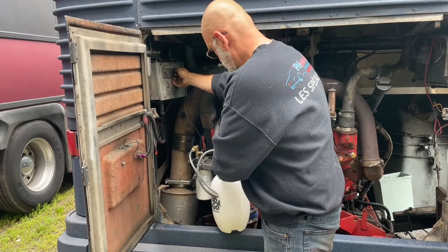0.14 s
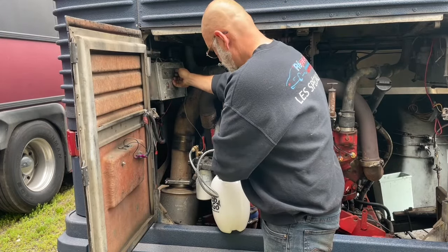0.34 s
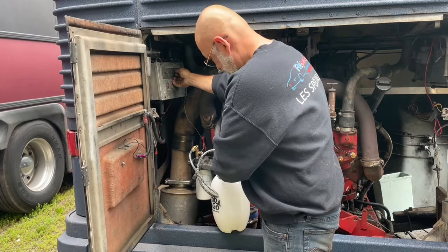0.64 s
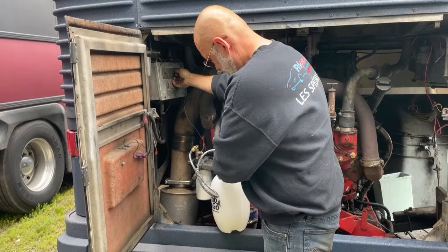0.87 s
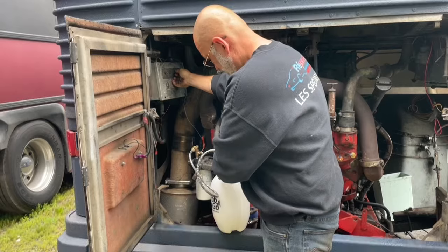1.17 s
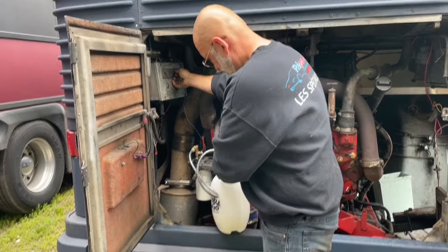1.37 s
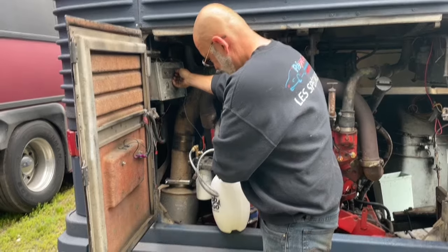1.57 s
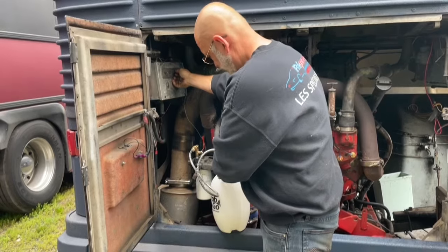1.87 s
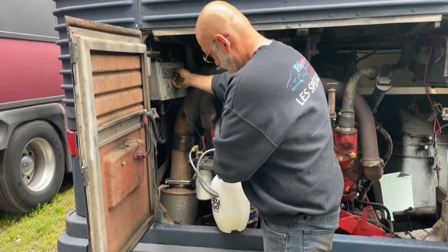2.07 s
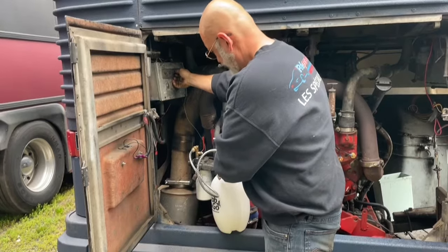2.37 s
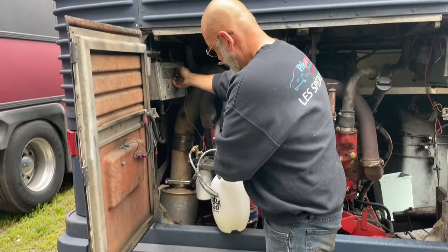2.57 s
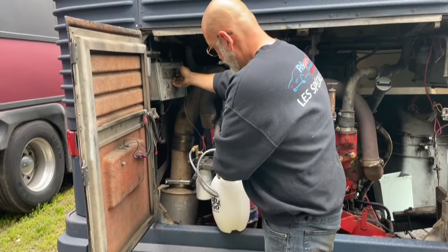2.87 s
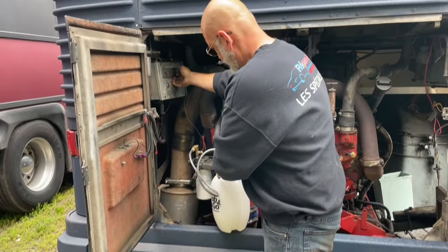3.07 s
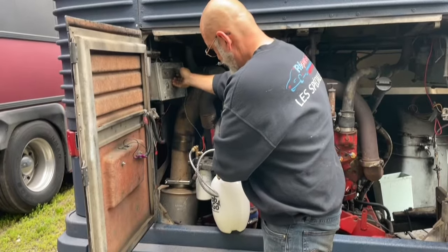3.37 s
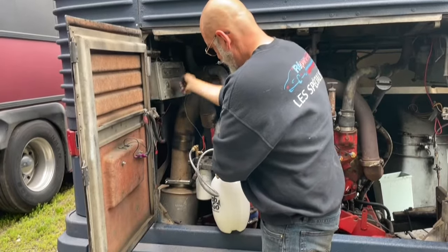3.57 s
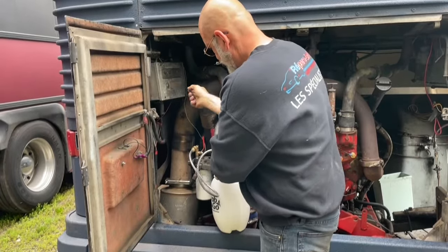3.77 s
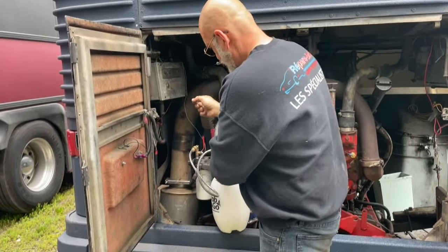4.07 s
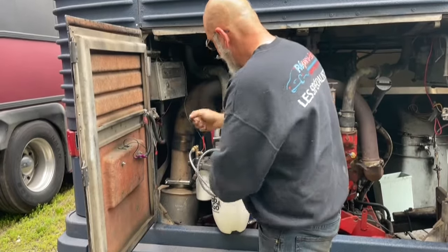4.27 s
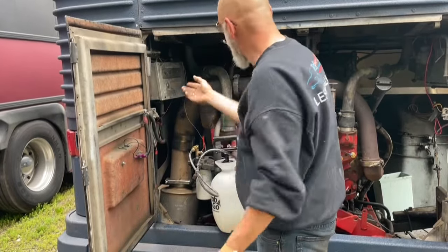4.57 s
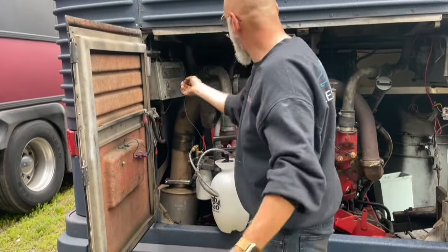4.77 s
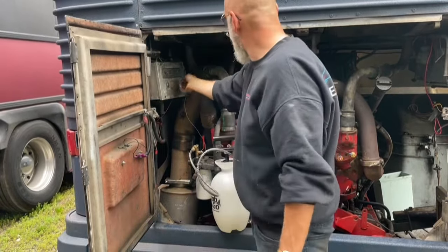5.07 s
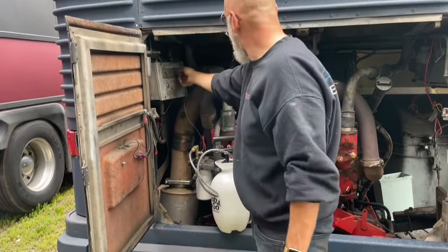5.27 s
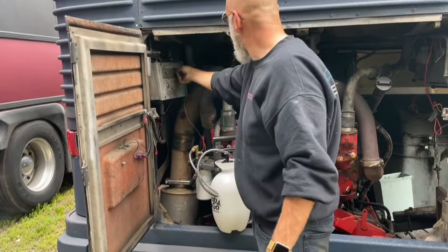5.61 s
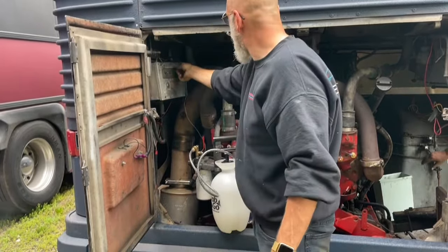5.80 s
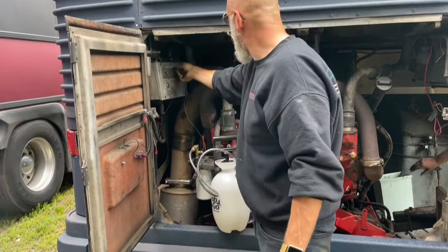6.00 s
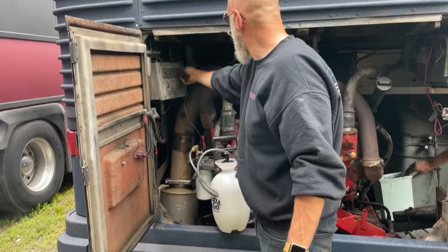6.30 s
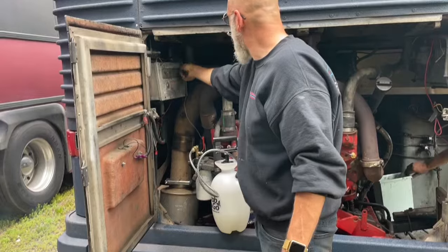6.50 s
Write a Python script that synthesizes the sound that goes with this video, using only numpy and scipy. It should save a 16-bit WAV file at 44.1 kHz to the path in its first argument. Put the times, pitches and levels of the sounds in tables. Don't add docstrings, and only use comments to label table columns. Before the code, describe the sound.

Outdoors, close to an open engine bay, faint traffic wash for a moment, then a short bright air hiss, a hard gear clank and a straining motor groan. The big diesel catches with misses, surges within a second, and hammers loudly with valve clatter. A metallic gear whine continues until about two and a half seconds, then drops out, leaving a deep lumpy idle with occasional coughs from the exhaust. Stereo microphones a step or two away.

```python
import sys
import numpy as np
from scipy import signal
from scipy.fft import rfft, irfft, next_fast_len
from scipy.io import wavfile
from scipy.ndimage import uniform_filter1d, map_coordinates

SR = 44100
rng = np.random.default_rng(int(sys.argv[2]) if len(sys.argv) > 2 else 0)


def invert_db(x):
    u = np.asarray(x, float) / 20
    return 10 ** u


def dump(signal):
    limited = np.clip(np.atleast_2d(signal).T, -1, 1)
    pcm = np.round(limited * 32767).astype(np.int16)
    wavfile.write(sys.argv[1], SR, pcm)


N = 293072


def unit(x):
    return x / np.sqrt(np.mean(x ** 2) + 1e-20)


def along(points, hz, column=1):
    rows = np.array(points)
    return np.interp(np.log(hz + 1), np.log(rows[:, 0] + 1), rows[:, column])


def wobble(rate_hz):
    knots = rng.standard_normal(int(N * rate_hz / SR) + 4)
    return map_coordinates(knots, [np.arange(N) * rate_hz / SR])


def filtered(x, response):
    m = next_fast_len(N + SR // 2)
    return irfft(rfft(x, m) * response(np.fft.rfftfreq(m, 1 / SR)), m)[..., :N]


def mode(f, hz, width):
    return 1j * f * width / (hz * hz - f * f + 1j * f * width)


def body(modes):
    return lambda f: sum((-1) ** k * invert_db(db) * mode(f, hz, w) for k, (hz, w, db) in enumerate(modes))


def noise(response, envelope=1):
    if not callable(response):
        points = response
        response = lambda f: invert_db(along(points, f))
    return unit(filtered(envelope * rng.standard_normal((2, N)), response))


def patchy(x, depth_db):
    z = signal.stft(x, nperseg=512)[2]
    field = uniform_filter1d(rng.standard_normal(z.shape[1:]), size=4, axis=0)
    field = uniform_filter1d(field, size=6, axis=1)
    return unit(signal.istft(z * invert_db(depth_db * unit(field)), nperseg=512)[1][:, :N])


def dying(impulses, t60):
    return signal.lfilter([1], [1, -invert_db(-60 / (t60 * SR))], impulses)


def gate(start, stop, edge):
    t = np.arange(N) / SR
    return np.clip(60 / edge * np.minimum(t - start, stop - t), -120, 0)


def peak(at, rise_db, fall_db):
    t = np.arange(N) / SR - at
    return np.minimum(rise_db * t, -fall_db * t)


# t/s, cycles of two turns per second/Hz
CRANK_SPEED = [(0.4, 1.279), (1, 5.436), (1.1, 5.636), (1.3, 6.741), (1.5, 6.776), (1.9, 6.278),
               (2.25, 6.184), (2.5, 6.311), (2.9, 6.077), (3.5, 6.24), (4.5, 6.304), (6.65, 6.403)]


def speed():
    return np.interp(np.arange(N) / SR, *np.transpose(CRANK_SPEED))


def crank():
    start_cycle = .7778
    return start_cycle + np.cumsum(speed()) / SR


def follows(full_db, running_speed, slope_db):
    turn_s = .495
    growth_db = slope_db * np.log2(np.minimum(speed() / running_speed, 1))
    return full_db + growth_db + gate(turn_s, 9, .06)


def strikes(degrees, sizes, scatter_db, jitter_deg):
    turned = crank()
    cycles = np.arange(1, int(turned[-1]) + 1)[:, None]
    chance = rng.standard_normal((len(cycles), len(degrees), 2))
    at = cycles + (degrees + jitter_deg * chance[..., 0]) / 720
    sample = np.interp(at, turned, np.arange(N), right=N).astype(int)
    force = sizes * invert_db(scatter_db * chance[..., 1])
    return np.bincount(sample.ravel(), force.ravel(), N + 1)[:N]


# f/Hz, level per Hz/dB
YARD_SPECTRUM = [(40, -90), (120, -84), (350, -81), (900, -78), (2300, -81), (4000, -97), (12000, -99),
                 (14000, -120)]


def yard():
    wash = invert_db(-52 + wobble(14)) * noise(YARD_SPECTRUM)
    bass = invert_db(-50 + 4.5 * wobble(17.6)) * noise(lambda f: mode(f, 80, 78) ** 2)
    return wash + bass


OPEN_S, BITE_S, RELEASE_S = .384, .424, 2.55

# f/Hz, width/Hz, level/dB
AIR_VALVE = [(3100, 120, -2), (3400, 80, 0), (3720, 80, 5), (4300, 100, 2), (4800, 110, 1), (5700, 200, -3),
             (6400, 200, 3), (7100, 400, 3), (8600, 1500, 2), (11300, 2000, 0)]


def air_jet(since):
    air_db = -14 - 50 * since - 380 * since ** 2 + gate(OPEN_S + .002, 9, .008)
    return invert_db(air_db + wobble(124)) * noise(lambda f: body(AIR_VALVE)(f) * mode(f, 4000, 19000))


# f/Hz, level per Hz/dB
GROAN_SPECTRUM = [(90, -43), (150, 0.5), (260, -3), (400, -11.5), (750, -9.5), (1500, -19), (2500, -19),
                  (6000, -37)]


def motor_groan():
    bite = invert_db(-27 + peak(BITE_S, rise_db=700, fall_db=120))
    hold = invert_db(-37 + gate(BITE_S, .72, .1))
    return (bite + hold) * invert_db(1.5 * wobble(60)) * noise(GROAN_SPECTRUM)


def armature_whirr(since):
    free_spin_hz = 130 * np.exp(-np.clip(since - .026, 0, None) / 0.0194)
    hz = 39.9 + 57 * speed() + free_spin_hz
    phase = 2 * np.pi * np.cumsum(hz * (1 + .05 * wobble(50))) / SR
    level_db = np.maximum(-27 + peak(.485, rise_db=80, fall_db=200), -35)
    level_db = level_db + gate(BITE_S, .86, .1)
    return invert_db(level_db + 4 * wobble(30)) * np.sin(phase)


# f/Hz, width/Hz, level/dB
GEAR_MODES = [(1870, 95, 1), (2215, 53, 6.5), (2418, 50, 3), (2720, 93, -2), (3060, 160, -4),
              (4660, 700, -15), (9500, 4700, -13)]
# t/s, level/dB, length/s
PINION_SURGES = [
    (1.27, 3, 0.049),
    (1.746, 4.5, 0.043),
    (1.996, 2.5, 0.05),
    (2.24, 6, 0.012),
    (2.427, 4.5, .04),
]


def gear_mesh():
    t = np.arange(N) / SR
    surge_db = sum(db * np.exp(-((t - s) / length) ** 2) for s, db, length in PINION_SURGES)
    level_db = follows(full_db=-28, running_speed=3.79, slope_db=31) + gate(0, RELEASE_S, 0.042)
    ring = patchy(noise(lambda f: body(GEAR_MODES)(f) * mode(f, 3700, 12000)), depth_db=3)
    return invert_db(level_db + surge_db + 2.4 * wobble(40.2)) * ring


# t/s, level/dB
GEAR_CLANKS = [
    (.366, -40),
    (.3856, -11),
    (1.0776, -17),
    (1.098, -22),
    (1.243, -24),
    (1.393, -24),
]


def gear_clanks():
    s, db = np.transpose(GEAR_CLANKS)
    snaps = dying(np.bincount((s * SR).astype(int), invert_db(db), N), t60=0.1)
    return snaps * noise(lambda f: mode(f, 8200, 13000) ** 2)


def starter():
    since = np.clip(np.arange(N) / SR - OPEN_S, 0, None)
    steel = air_jet(since) + gear_mesh() + gear_clanks()
    steel = filtered(steel, lambda f: 1 / (1 + (f / 12900) ** 18))
    return motor_groan() + armature_whirr(since) + steel


# crank angle/deg, knock level/dB, tick level/dB, decay time t60/s
VALVE_SEATS = [
    (109, -11.5, 7.5, 0.3),
    (137, 4, -16, 0.19),
    (256, -9, -13, 0.82),
    (333, 3.5, -5, 0.19),
    (512, 9, 11, 0.14),
    (608.4, 7.5, 5.5, 0.2),
]
# f/Hz, level per Hz/dB
KNOCK_SPECTRUM = [(1200, -8.5), (2000, -5), (3200, -4), (4200, -4), (5500, -9.5), (7000, -10), (9000, -45)]
TICK_SPECTRUM = [(3500, -20), (5500, -27), (7000, 1.5), (8500, 7.5), (10500, 6.5), (12000, 1.5),
                 (13300, -7), (15000, -45)]


def clatter(level_db):
    knock, tick = np.full(N, .25), np.full(N, .2)
    for degree, knock_db, tick_db, t60 in VALVE_SEATS:
        seat = dying(strikes(np.array([degree]), 1, scatter_db=1.7, jitter_deg=2), t60)
        knock += invert_db(knock_db) * seat
        tick += invert_db(tick_db) * seat
    grit = invert_db(1.3 * wobble(45))
    dull = invert_db(4.5) * patchy(noise(KNOCK_SPECTRUM, knock), depth_db=2.5)
    bright = invert_db(3.5) * patchy(noise(TICK_SPECTRUM, tick * grit), depth_db=3.5)
    return invert_db(level_db) * (dull + bright)


FIRING_ORDER = [(-21.4, 0.5), (32.3, 0.39), (95.0, 0.8), (157.7, 1.0), (217.1, 1.04), (293.8, 0.76),
                (342.7, 1.06), (395.0, 1.43), (465.5, 0.97), (535.3, 0.84), (585.2, 0.65), (634.0, 1.47)]
# f/Hz, width/Hz, level/dB
BLOCK_MODES = [(246.5, 99, -4), (515, 76, -4.5), (659.7, 22.2, 4.5), (721.6, 21.8, 2), (755, 35.4, 1.5),
               (831, 59, 0.5), (992, 167, -4), (1424, 252, -6.5), (1765, 235, -8.5), (3050, 790, -17)]


def block(level_db):
    degrees, sizes = np.transpose(FIRING_ORDER)
    blows = strikes(degrees + 25, sizes[::-1], scatter_db=1.5, jitter_deg=1.5)
    rattle = patchy(noise(body(BLOCK_MODES), .9 + dying(blows, t60=.06)), depth_db=.3)
    sharp = unit(filtered(blows, lambda f: body(BLOCK_MODES[1:6])(f) * mode(f, 700, 240)))
    return invert_db(level_db + .2 * wobble(9)) * (rattle + invert_db(-6) * sharp * [[1], [.3]])


# f/Hz, width/Hz, signed gain
PIPE_MODES = [(63.4, 16.5, 272.0), (83.2, 91.3, -169.2), (104.4, 12.0, 147.4), (147.1, 28.7, 130.3),
              (179.8, 11.9, 24.1), (241.3, 106.4, 16.9)]


def pipe_note():
    degrees, sizes = np.transpose(FIRING_ORDER)
    pulses = strikes(degrees, sizes, scatter_db=.5, jitter_deg=.8)
    tail_pipe = lambda f: (1 + .4 * mode(f, 146, 16) + .2 * mode(f, 76, 12)) * np.exp(-(f / 550) ** 2)
    pipe = lambda f: sum(gain * mode(f, hz, w) for hz, w, gain in PIPE_MODES)
    return unit(filtered(pulses, lambda f: tail_pipe(f) * pipe(f)))


# multiple of the cycle rate, level/dB
BLOWER_TONES = [
    (30, -32.5),
    (31, -33.5),
    (43, -33.5),
    (44, -43.5),
]


def blower_hum():
    return sum(invert_db(db + 13 + wobble(3.11)) * np.sin(2 * np.pi * (k * crank() + rng.random()))
               for k, db in BLOWER_TONES)


# t/s, level/dB, ring f/Hz, lost share of the note (0-1)
TAIL_COUGHS = [
    (.688, -18, 240, 0),
    (2.33, -20, 250, .2),
    (2.89, -14, 220, .5),
    (3.02, -11, 310, .2),
    (3.993, -8, 340, .5),
    (4.3, -14, 310, .4),
    (5.07, -13, 310, .2),
    (5.72, -10, 350, .3),
]


def cough_at(note):
    t, coughs = np.arange(N) / SR, np.zeros(N)
    for s, db, ring_hz, lost in TAIL_COUGHS:
        since = np.clip(t - s, 0, None)
        note = note * (1 - np.clip(lost, 0, 1) * np.exp(-((t - s - .015) / 0.011) ** 2))
        ring = np.sin(2 * np.pi * ring_hz * since)
        ring += 0.67 * np.sin(3 * np.pi * ring_hz * since)
        coughs += invert_db(db - 60 * since / 0.047) * ring
    return note, coughs


# f/Hz, level per Hz/dB
FLOW_SPECTRUM = [(25, -32), (50, 14.5), (90, -7), (150, -3), (220, 10.5), (350, -3.5), (600, 3),
                 (1000, -36)]


def exhaust(level_db):
    note = pipe_note() + blower_hum()
    dull = filtered(note, lambda f: 1 / (1 + (f / 110) ** 4))
    crisp = np.minimum(speed() / 6.38, 1) ** 3
    note, coughs = cough_at(crisp * note + (1 - crisp) * dull)
    rumble = invert_db(-15.5 + 2 * wobble(10)) * noise(FLOW_SPECTRUM)
    return invert_db(level_db) * (note * [[1.1], [0]] + rumble) + coughs * [[1], [.3]]


# t/s, exhaust level lost/dB
MISSED_FIRINGS = [
    (.59, 16),
    (.785, 4),
    (.953, 10),
    (1.033, 4),
    (1.144, -1),
]


def engine():
    t = np.arange(N) / SR
    missed_db = sum(db * np.exp(-((t - s) / 0.011) ** 2) for s, db in MISSED_FIRINGS)
    harsh_db = 2 * np.exp(-np.clip(t - 1.1, 0, None) / 0.83)
    shake_db = 2 * invert_db(gate(0, RELEASE_S, 0.12))
    valves = clatter(follows(full_db=-38, running_speed=4.8, slope_db=22) + harsh_db + shake_db)
    castings = block(follows(full_db=-23, running_speed=5.5, slope_db=11) + 0.26 * harsh_db)
    gas = exhaust(follows(full_db=-10.5, running_speed=4.56, slope_db=20.6) - missed_db)
    return valves + castings + gas


# f/Hz, likeness (0-1), left louder
# level/dB, left leads phase/rad
CHANNEL_PAIR = [(100, .96, 0, .15), (1100, .53, 1, -.55), (3200, .74, 4, 1.2), (5500, .45, 2, 0),
                (7900, .99, 0, -3.05), (9400, .995, 0, -3.2), (10300, .85, 0, -4.3), (13000, .9, 0, -6.28)]


def scene():
    both = yard() + starter() + engine()
    turn = lambda f: np.arccos(np.clip(along(CHANNEL_PAIR, f), 0, 1)) / 2
    direct, scattered = filtered(both, lambda f: np.array([np.cos(turn(f)), np.sin(turn(f))]))
    return np.array([direct + scattered, direct - scattered])


def top_cut(x):
    return signal.sosfilt(signal.butter(12, 15680, fs=SR, output="sos"), x)


def record(dry):
    side = np.array([[.5], [-.5]])
    level = lambda f: invert_db(side * along(CHANNEL_PAIR, f, column=2))
    phase = lambda f: np.exp(1j * side * along(CHANNEL_PAIR, f, column=3))
    x = filtered(dry, lambda f: level(f) * phase(f))
    x = filtered(x, lambda f: 1 / (1 + (f / 14900) ** 20))
    x = x / (1 + np.abs(x / .93) ** 7) ** (1 / 7)
    return top_cut(x)


dry = scene()
out = record(dry)
dump(out)
```